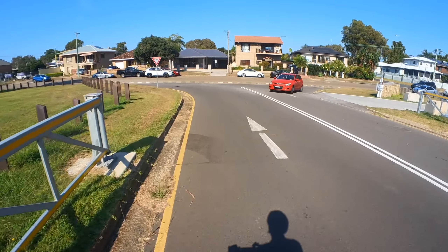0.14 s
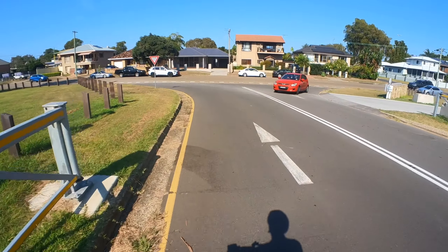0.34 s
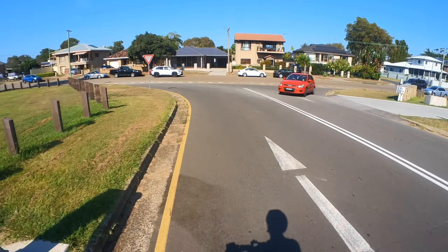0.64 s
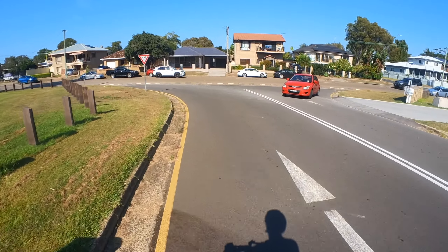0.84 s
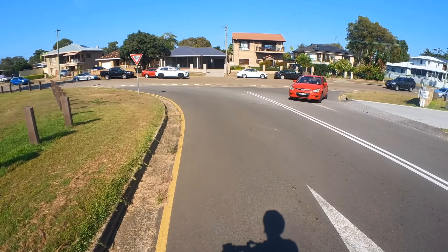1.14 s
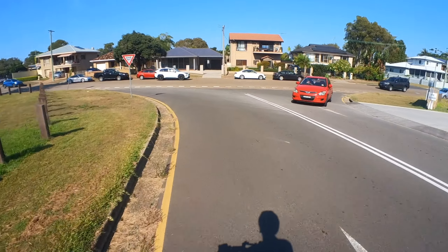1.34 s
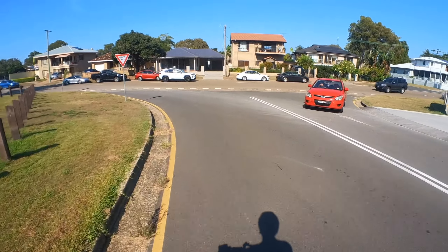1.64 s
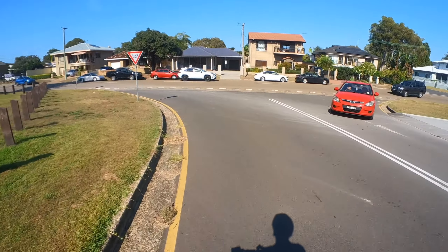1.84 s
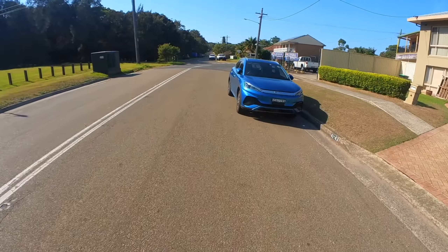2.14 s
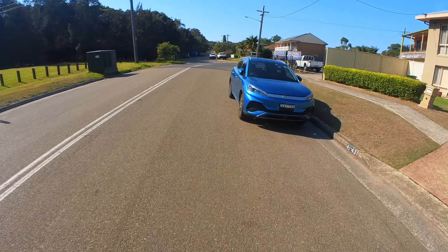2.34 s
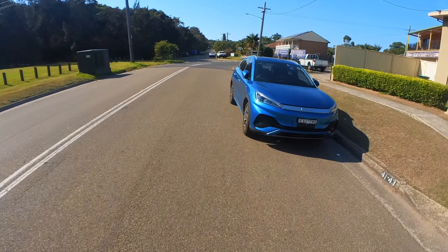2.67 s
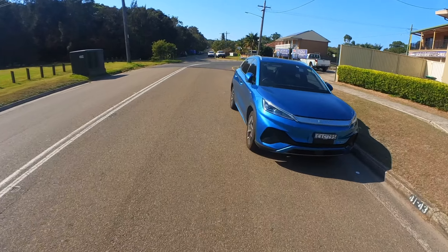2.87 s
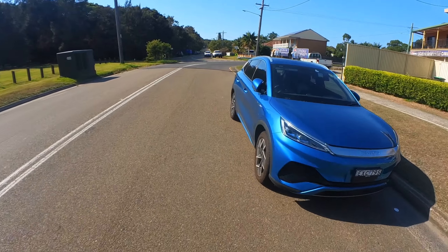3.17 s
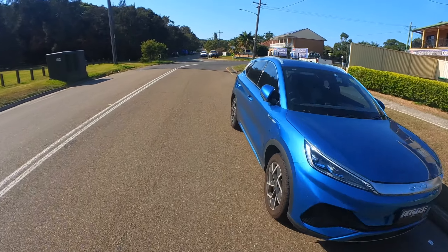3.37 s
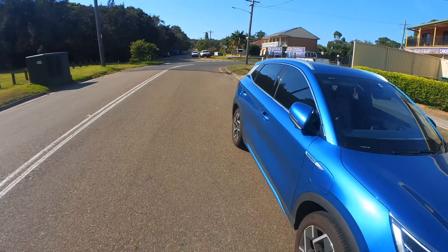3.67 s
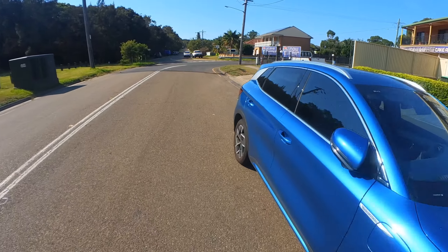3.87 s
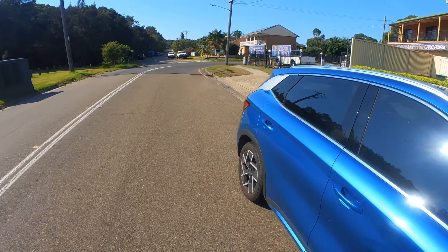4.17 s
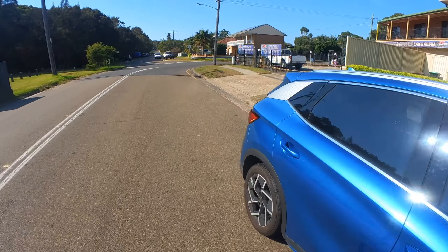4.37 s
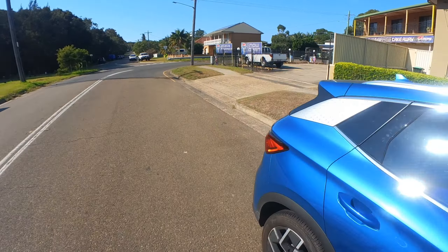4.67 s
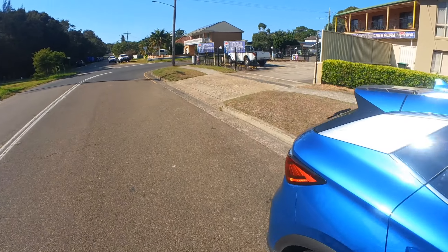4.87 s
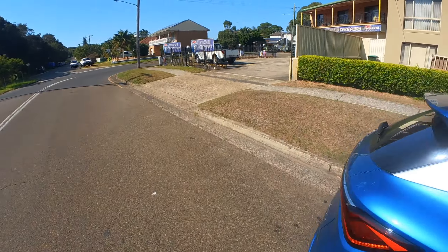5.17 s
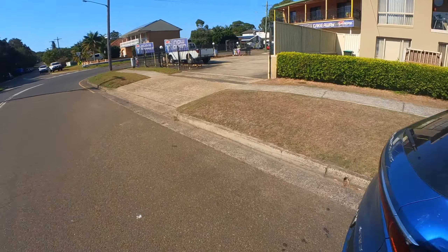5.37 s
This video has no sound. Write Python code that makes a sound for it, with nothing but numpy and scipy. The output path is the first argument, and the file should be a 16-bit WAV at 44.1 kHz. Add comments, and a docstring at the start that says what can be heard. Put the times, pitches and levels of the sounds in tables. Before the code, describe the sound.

A bicycle rolls along a street, with a soft tyre rush and low, gusty wind on the microphone. From the start its disc brake squeals loudly on one high pitch, throbbing quickly, with a light scrape and faint chirps on top. The squeal fades by 0.9 seconds, as a cluster of low wind thumps hits the microphone. A second squeal swells from about 1.3 seconds and is cut off abruptly at 1.9. Tyres then roll on coarser asphalt with a faint falling hum, while the wind gusts, bumps a few times and eases. At about 4.2 seconds a third squeal rises, loudest around 4.6, throbbing ever slower as the bicycle loses speed. Sharp, much higher chirps join it and grow strong from 5 seconds. Everything stops dead at 5.4 seconds.

```python
"""A bicycle rolls down a street, tyres rushing and wind rumbling on the microphone. Its disc brake squeals
on one rotor resonance, throbbing as the uneven disc passes the pads, with faint chirps on top. Wind thumps
as the squeal fades. A second squeal swells; at 1.9 s the sound cuts abruptly, mid-squeal, to another ride
on coarser asphalt. From 4 s a third squeal throbs ever slower, and near walking pace two higher rotor
modes chirp loudly. At 5.4 s the sound stops dead."""
import sys
import numpy as np
from scipy.fft import rfft, irfft, next_fast_len
from scipy.io import wavfile
from scipy.ndimage import map_coordinates

SR = 44100
rng = np.random.default_rng(int(sys.argv[2]) if len(sys.argv) > 2 else 0)


def file_out(sig):
    """Save sig as 16-bit WAV at sys.argv[1]."""
    # one column per channel
    cols = np.atleast_2d(sig).T
    # limit, then scale
    lim = np.clip(cols, -1, 1)
    pcm = np.round(lim * 32767).astype(np.int16)
    wavfile.write(sys.argv[1], SR, pcm)


N = 242991
CUT_S, STOP_S = 1.902, 5.4  # hard cut from the first ride to the second; all sound stops
SQUEAL_HZ, LOW_HZ, HIGH_HZ = 1641.5, 6274, 12415  # the rotor's main mode and its two chirping modes
TOP_HZ = 15500

# the slowing disc, one row a ride: throb_peak_s, throb_rate_hz, slowing_hz_per_s
DISC_SPIN = [(0.017, 18.83, 1.105), (4.141, 12.02, 4.32)]
# three brake pulls, a list each: time_s, squeal_peak_db, throb_depth_db, pressure_db, overtone_bite_db
BRAKE_PULLS = [
    [(0, -12, 4.5, -1, -3.5), (.15, -11, 3, 0, -1), (.33, -12, 5.5, -0.5, -3), (.49, -22, 7, -6, -16.5),
     (.61, -19, 4.5, -7.5, -7.5), (.69, -20, 8.5, -14, -18), (.79, -19, 3, -17, -11),
     (.84, -30, 2.5, -19.5, -18), (.89, -50.5, 9.5, -30, -37)],
    [(1.26, -56, 8, -29, -43), (1.39, -30, 10, -19, -30.5), (1.47, -25.5, 9, -15.5, -14),
     (1.6, -19.5, 9.5, -10, -4.5), (1.72, -15.5, 15, -1.5, -2), (1.79, -15, 6, -5, 3.5),
     (1.9, -12.5, 10, 2, -1.5)],
    [(4.05, -57, -1.5, -12, -45), (4.25, -33.5, 11.5, -10.5, -28.5), (4.33, -21.5, 6, -3.5, -4),
     (4.51, -21.5, 17.5, -3, -7.5), (4.56, -13.5, 27, -2.5, 1.5), (4.62, -21, -1, 1, -1),
     (4.7, -14.5, 6, 1, -6.5), (4.8, -17.5, 9.5, -1, -6.5), (4.95, -23.5, 6.5, -4, 0.5),
     (5.12, -26.5, 6, -2, -9), (5.39, -23, 5.5, 3.5, -5)],
]
# overtones of the slipping contact: harmonic, level_db, growth_db_per_bite_db, roughness, flare_share
SQUEAL_OVERTONES = [(2, -49.5, 0.97, 0.6, 1.0), (3, -55.5, 1.28, .52, 0.6)]
# the overtones flare up: peak_s, boost_db
OVERTONE_FLARES = [(.265, 4.5), (4.742, 17), (5.28, 7.5)]
# resonances rung by the scraping (rotor modes, plus a band at 8190 Hz, five times the squeal's pitch):
# pitch_hz, width_hz, relative_db
ROTOR_MODES = [(1580, 8.3, 1.5), (2027, 120, 0.5), (2532, 43, 5.5), (2780, 79, -11.5), (3286, 120, 0.5),
               (4807, 220, -12), (6400, 290, -14), (6580, 40, -9.5), (8190, 130, -18), (9600, 60, -19.5),
               (12550, 300, -29)]
# colour of the pads' hiss: frequency_hz, relative_db
SCRAPE_SPECTRUM = [(900, -15.5), (1700, 21), (2300, 16), (2800, 18), (3400, 20.5), (3950, 2), (4700, 12),
                   (5200, 8.5), (5800, -2), (6500, 11.5), (7400, -8), (9800, -1), (10500, -22),
                   (15000, -32.5)]
# high rotor modes sputtering under the pads: pitch_hz, level_db, growth_db_per_pressure_db
SPUTTER_MODES = [(LOW_HZ, -67.5, 2.1), (12540, -83, 2.1)]
# steady bed of wind: time_s, level_db
WIND_BED = [(0, -42.5), (.45, -43), (.85, -35), (1.3, -39.5), (1.8, -43.5), (2.5, -47.5), (3.3, -50),
            (3.8, -49), (4.8, -42), (5.4, -47)]
# gusts over the bed: peak_s, peak_db, width_at_half_height_s
WIND_GUSTS = [(.1, -34.5, 0.055), (.71, -29.5, 0.067), (1.061, -33.5, 0.1), (1.54, -34.5, 0.2),
              (1.91, -35.5, 0.0507), (2.04, -37.5, 0.068), (2.151, -32, 0.045), (2.241, -37, 0.053),
              (2.35, -34.5, 0.056), (2.46, -41.5, 0.11)]
# colour of the wind: frequency_hz, relative_db
RUMBLE_SPECTRUM = [(20, -57), (33, -33.5), (52, -7), (80, 1.5), (108, 0.5), (160, -5), (220, -12),
                   (400, -27), (800, -46), (2000, -81.5)]
# fader curve of the tyre rush: time_s, relative_db
RUSH_LEVELS = [(0.0, -55), (0.54, -54), (0.96, -56.5), (1.39, -56.5), (2.33, -54), (3.01, -56), (4.16, -51),
               (4.78, -46.5), (5.23, -48), (5.26, -47.5), (5.3, -54.5)]
# tread hum, falling as the wheels slow: time_s, pitch_hz, relative_db
TREAD_HUM = [(0, 439.6, -65), (1.9, 428.8, -62.5), (2.4, 400, -57.5), (3.1, 380.6, -55), (4.0, 305, -60),
             (4.45, 281, -44), (5.4, 255, -48)]
# colour of tyres on the first ride's smooth asphalt: frequency_hz, relative_db
SMOOTH_SPECTRUM = [(35, -40.5), (60, -2), (120, 8.5), (280, 3.5), (400, 3), (650, -0.5), (1000, -2),
                   (1500, -9.5), (2400, -13), (3300, -25.5), (3900, -32), (8000, -69)]
# colour of tyres on the second ride's coarse asphalt: frequency_hz, relative_db
COARSE_SPECTRUM = [(35, -48), (56, 8.5), (120, -1), (250, 4.5), (400, -1.5), (520, 1), (660, -1),
                   (840, -3.5), (1060, -2), (1350, -6.5), (1800, -11.5), (2400, -17.5), (3200, -32.5),
                   (8000, -72.5)]
# colour of the fine tyre hiss: frequency_hz, relative_db
TYRE_HISS_SPECTRUM = [(1500, -27), (2900, 2.5), (4000, 0.5), (6000, -6), (9000, -11), (11000, -13.5),
                      (14000, -28.5), (16000, -49)]
# squeaks where a higher mode catches fully: peak_s, peak_db, pitch_hz
ROTOR_CHIRPS = [(0.115, -47, LOW_HZ), (0.151, -48, LOW_HZ), (0.185, -51.5, LOW_HZ), (0.419, -56, LOW_HZ),
                (0.455, -53, LOW_HZ), (0.51, -57, LOW_HZ), (0.57, -55, LOW_HZ), (0.63, -63, LOW_HZ),
                (1.79, -54, LOW_HZ), (1.875, -60, LOW_HZ), (2.299, -66, 3340), (4.605, -45, LOW_HZ),
                (4.675, -40, LOW_HZ), (4.72, -61, HIGH_HZ), (4.745, -47.5, LOW_HZ), (4.885, -64, HIGH_HZ),
                (4.915, -49.5, LOW_HZ), (4.993, -36.5, LOW_HZ), (5.02, -45.5, LOW_HZ),
                (5.066, -51, HIGH_HZ), (5.157, -34.5, HIGH_HZ), (5.172, -41, LOW_HZ),
                (5.256, -31.5, HIGH_HZ), (5.263, -28, LOW_HZ), (5.358, -31, HIGH_HZ), (5.366, -31, LOW_HZ)]
# buffets on the microphone: start_s, level_db, knock_relative_db
WIND_THUMPS = [(0.702, -28.5, -39.5), (0.717, -12.5, -25), (0.726, -8.5, -39), (0.784, -22, -10.5),
               (0.796, -19.5, -15.5), (0.852, -6.5, -29.5), (0.865, -21, -6.5), (0.875, -10.5, -19.5),
               (2.114, -18.5, -39), (2.592, -25, -20), (3.548, -28, -23)]
# colour of a buffet's puff of air: frequency_hz, relative_db
PUFF_SPECTRUM = [(150, -27), (300, 9), (520, -6), (750, -10), (1200, -39.5), (3000, -71.5)]


def amp(db):
    """Decibels to gain."""
    return 10 ** (np.asarray(db) / 20)


def unit(x):
    """Scale to rms 1."""
    return x / np.sqrt(np.mean(x ** 2) + 1e-20)


def clock():
    """Time of every sample in seconds."""
    return np.arange(N) / SR


def curves(rows):
    """An automation curve for each column after the time."""
    times, *columns = np.transpose(rows)
    return [np.interp(clock(), times, column) for column in columns]


def wobble(rate):
    """A smooth random curve, rate knots a second."""
    return map_coordinates(rng.standard_normal(int(N * rate / SR) + 4), [clock() * rate])


def filtered(x, response):
    """Equalise x with a gain given as a function of frequency."""
    size = next_fast_len(N + SR // 2)
    return irfft(rfft(x, size) * response(np.fft.rfftfreq(size, 1 / SR)), size)[:N]


def noise(spectrum):
    """Noise of rms 1 in the given colour."""
    points_hz, db = np.transpose(spectrum)
    colour = lambda hz: amp(np.interp(np.log(hz + 1), np.log(points_hz), db))
    return unit(filtered(rng.standard_normal(N), colour))


def fuzzy_tone(pitch_hz, rough, rate):
    """A tone of rms 1 whose level and phase wander, rate times a second."""
    grain = 1 + rough * (wobble(rate) + 1j * wobble(rate))
    return unit(np.real(grain * np.exp(2j * np.pi * np.cumsum(pitch_hz * np.ones(N)) / SR)))


def disc_throb():
    """Pad grip (0-1), rising and falling as the uneven disc turns, and disc speed (1 at the start)."""
    t = clock()
    peak_s, rate_hz, slowing = np.array(DISC_SPIN)[(t > CUT_S).astype(int)].T
    throbs = rate_hz * (t - peak_s) - slowing * (t - peak_s) ** 2 / 2
    speed = rate_hz - slowing * (t - peak_s)
    return np.cos(np.pi * throbs) ** 2, speed / speed[0]


def brake_pulls(grip, fade_s=0.032):
    """Envelopes of squeal level, pad pressure and bite, all zero while the brake is open."""
    t, controls = clock(), np.zeros((3, N))
    for pull in BRAKE_PULLS:
        squeal_db, depth_db, pressure_db, bite_db = curves(pull)
        outside_s = np.maximum(pull[0][0] - t, t - pull[-1][0])
        closed = np.clip(2 - outside_s / fade_s, 0, 1)
        swell = np.sqrt(grip ** 2 + amp(-depth_db) ** 2 * (1 - grip ** 2))
        controls += closed * np.array([amp(squeal_db) * swell, amp(pressure_db), amp(bite_db)])
    return controls


def squeal(level, bite, grip, speed, sag_hz=8, slack_hz=9, flicker_db=2.73, flare_s=0.027):
    """The rotor sings on one mode; the pitch sags between swells and when the pads bite less."""
    sag = sag_hz * speed * (1 - grip) + slack_hz * (1 - np.sqrt(bite))
    pitch_hz = SQUEAL_HZ - sag + 2.2 * wobble(16) + 1.4 * wobble(180)  # slow drift, fast jitter
    flutter = amp(0.52 * wobble(15) + 0.6 * wobble(170))
    tone = level * flutter * np.sin(2 * np.pi * np.cumsum(pitch_hz) / SR)
    # the overtones come from the slipping contact and are much less steady
    flare_db = sum(db * np.exp(-.5 * ((clock() - s) / flare_s) ** 2) for s, db in OVERTONE_FLARES)
    for harmonic, db, growth, rough, share in SQUEAL_OVERTONES:
        gain = amp(db + share * flare_db + flicker_db * wobble(45)) * bite ** growth
        tone += gain * fuzzy_tone(harmonic * pitch_hz, rough, rate=130)
    return tone


def pad_scrape(rub, grip, ring_db=-55.5, hiss_db=-54, grit_db=2.6):
    """Pads rub the disc: a gritty hiss, with the rotor's other modes ringing in it."""
    def resonances(f):
        return sum(amp(db) * (1j * f * width / (hz * hz - f * f + 1j * f * width)) ** 2
                   for hz, width, db in ROTOR_MODES)
    friction = rng.standard_normal(N) * amp(4.2 * wobble(60))
    ring = unit(filtered(friction, resonances))
    hiss = noise(SCRAPE_SPECTRUM) * amp(grit_db * wobble(150))
    pulse = amp(0.25 + 0.5 * grip)
    return rub * (amp(hiss_db) * hiss + amp(ring_db) * ring) * pulse


def rotor_sputter(pressure, fitful_db=5.5):
    """Under pressure the high modes keep half catching, in short random fits."""
    out = np.zeros(N)
    for hz, db, growth in SPUTTER_MODES:
        fits = amp(db + fitful_db * wobble(45)) * pressure ** growth
        pitch_hz = hz + 35 * hz / LOW_HZ * wobble(120)
        out += fits * fuzzy_tone(pitch_hz, rough=1.0, rate=200)
    return out


def pad_drag(pressure, pitch_hz=1638, open_db=-69, pressed_db=-55):
    """Lightly touching pads keep the rotor's main mode just alive."""
    return (amp(open_db) + amp(pressed_db) * pressure) * fuzzy_tone(pitch_hz, rough=2.9, rate=45)


def wind(lump_db=2.5, fully_lumpy_db=-42):
    """Eddies at the microphone make a rumble that swells in gusts and is lumpier in a stronger wind."""
    bed = amp(curves(WIND_BED)[0])
    gusts = sum(amp(db) * 2 ** -((2 * (clock() - s) / width) ** 2) for s, db, width in WIND_GUSTS)
    strength = np.minimum(bed / amp(fully_lumpy_db), 1)
    lumps = amp(lump_db * np.sqrt(strength) * wobble(28))
    return np.hypot(bed, gusts) * lumps * noise(RUMBLE_SPECTRUM)


def tyres(rush_trim_db=4.5, hum_trim_db=-1, hiss_db=-80, quiet_db=-54.5, hiss_growth=2.57):
    """Tyres rush on the asphalt, with a humming tread and a fine hiss that grows faster than the rush."""
    level_db, = curves(RUSH_LEVELS)
    tread_hz, tread_db = curves(TREAD_HUM)
    surface = np.where(clock() < CUT_S, noise(SMOOTH_SPECTRUM), noise(COARSE_SPECTRUM))
    rush = amp(level_db + rush_trim_db + 0.98 * wobble(14)) * surface
    hum = amp(tread_db + hum_trim_db) * fuzzy_tone(tread_hz, rough=4.3, rate=83)
    lift_db = hiss_growth * np.maximum(level_db - quiet_db, 0)
    hiss = amp(hiss_db + lift_db + 1.05 * wobble(130)) * noise(TYRE_HISS_SPECTRUM)
    return rush + hum + hiss


def rotor_chirps(rise_s=0.0069, reach_s=0.23, ring_db=-11, shake_hz=1636):
    """A high mode catches for a moment, then rings out; the main squeal shakes it into side tones."""
    t, out = clock(), np.zeros(N)
    waver = 38 * wobble(250)
    for peak_s, db, hz in ROTOR_CHIRPS:
        near = slice(*np.searchsorted(t, [peak_s - reach_s, peak_s + reach_s]))
        age = t[near] - peak_s
        height = hz / LOW_HZ  # higher modes die sooner and waver more
        catch = np.exp(-.5 * (age / rise_s) ** 2)
        tail = amp(ring_db - 60 * np.abs(age) / reach_s * height) * np.clip(1 + age / rise_s, 0, 1)
        shake = 1 + amp(-27) * (hz / TOP_HZ) ** 2 * np.sin(2 * np.pi * shake_hz * age)
        tone = np.sin(2 * np.pi * np.cumsum(hz + waver[near] * height) / SR)
        out[near] += amp(db) * np.maximum(catch, tail) * shake * tone
    return out


def wind_thumps(body_hz=155, knock_hz=390, body_t60_s=0.051, knock_t60_s=0.025, attack_s=0.0013):
    """Each buffet is a few low cycles with a shorter, higher knock and a puff of air on top."""
    out, t = np.zeros(N + SR), np.arange(SR // 8) / SR
    air = noise(PUFF_SPECTRUM)
    onset = 1 - np.exp(-t / attack_s)
    for start_s, db, knock_db in WIND_THUMPS:
        start = round(start_s * SR)
        span = slice(start, start + len(t))
        low_hz, upper_hz = np.array([body_hz, knock_hz]) * amp(0.85 * rng.standard_normal(2))  # detune
        body = amp(-0.5 - 60 * t / body_t60_s) * np.sin(2 * np.pi * low_hz * t)
        knock = amp(11) * np.sin(2 * np.pi * upper_hz * t) + amp(5) * air[span]
        knock *= amp(knock_db - 60 * t / knock_t60_s)
        out[span] += amp(db) * (body + knock) * onset
    return out[:N]


def scene():
    """The brake over wind and tyres, in two rides joined by a hard cut at CUT_S."""
    grip, speed = disc_throb()
    # keeps the first ride's squeal and chirps from ringing over the cut
    gate = np.interp(clock() - CUT_S, [-.003, 0, .2, .25], [1, 0, 0, 1])
    level, pressure, bite = brake_pulls(grip) * gate
    brake = squeal(level, bite, grip, speed) + pad_scrape(pressure * speed, grip)
    brake += rotor_sputter(pressure) + gate * rotor_chirps() + pad_drag(pressure)
    return (brake + wind() + wind_thumps() + tyres())[None]


def record(dry, low_cut_hz=46):
    """Mute the mix at STOP_S, roll off the deepest rumble and keep nothing above TOP_HZ."""
    band = lambda hz: (hz < TOP_HZ) * hz ** 4 / np.hypot(hz ** 4, low_cut_hz ** 4)
    return filtered(dry[0] * (clock() < STOP_S), band)[None]


dry = scene()
out = record(dry)
file_out(out)
```